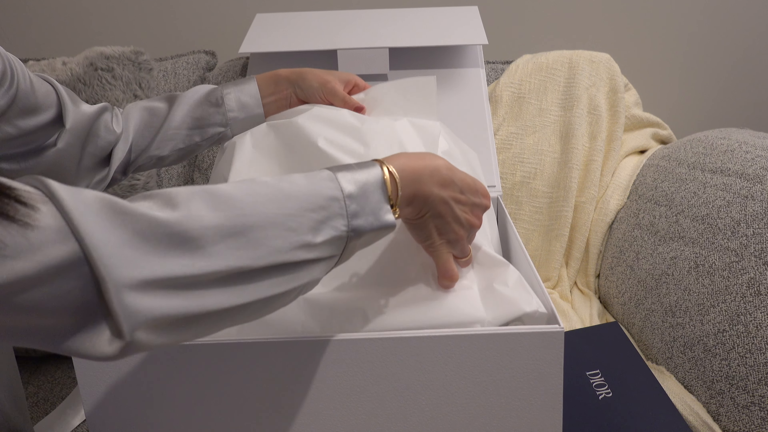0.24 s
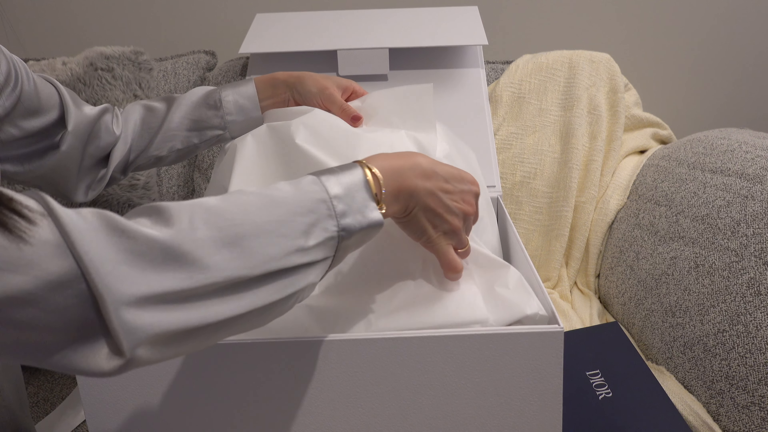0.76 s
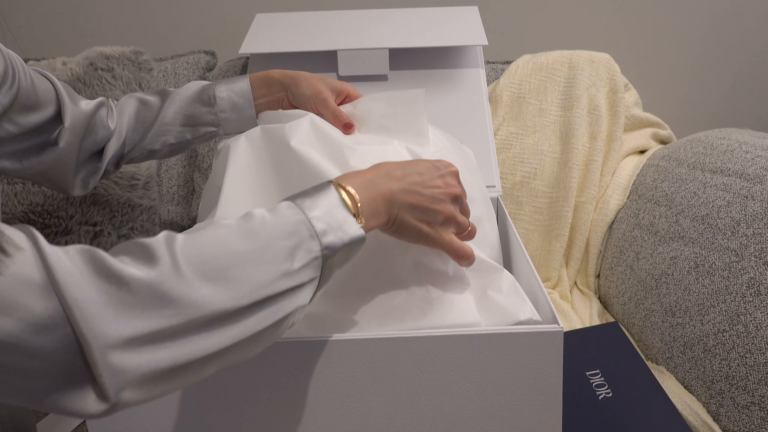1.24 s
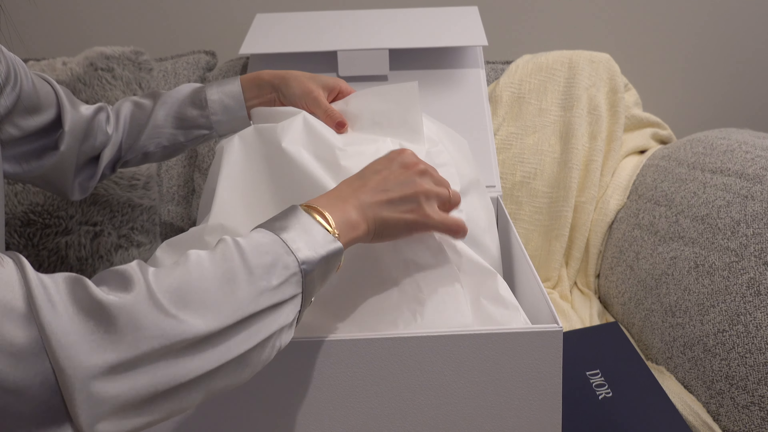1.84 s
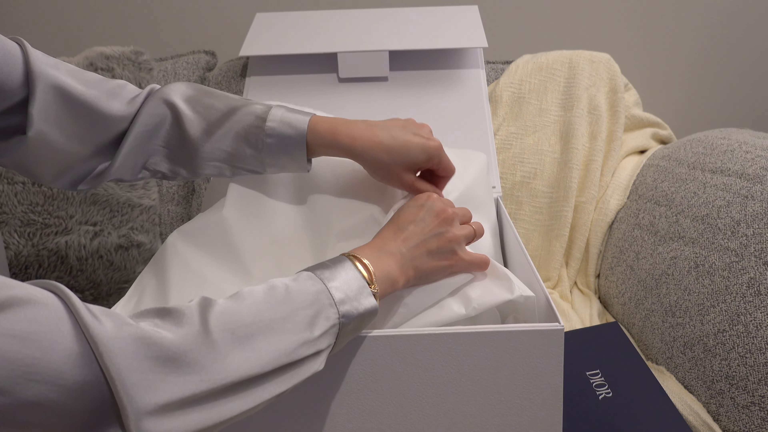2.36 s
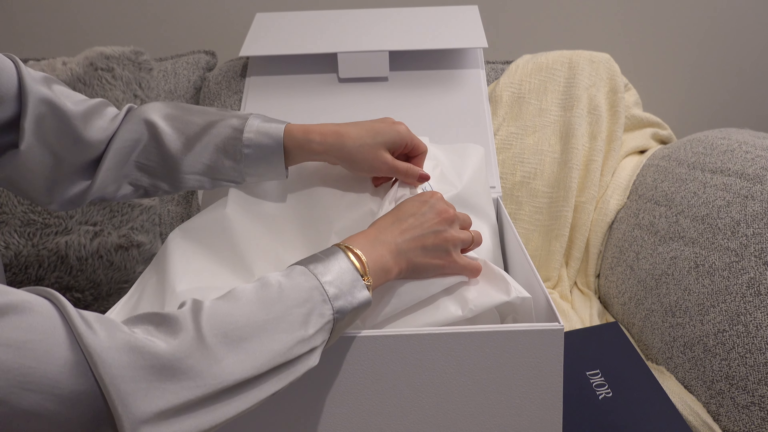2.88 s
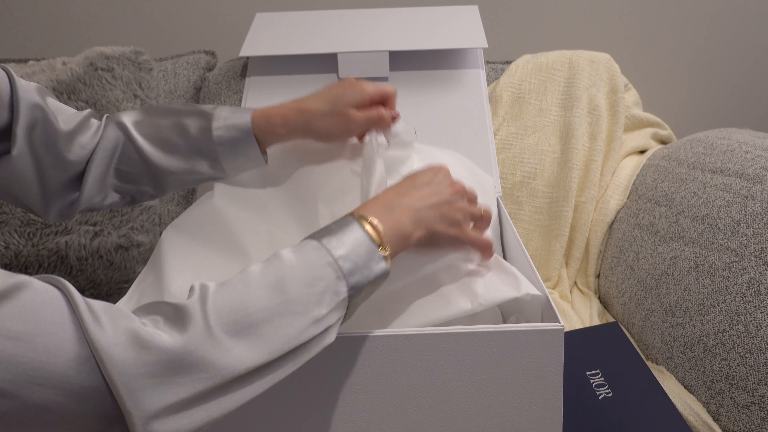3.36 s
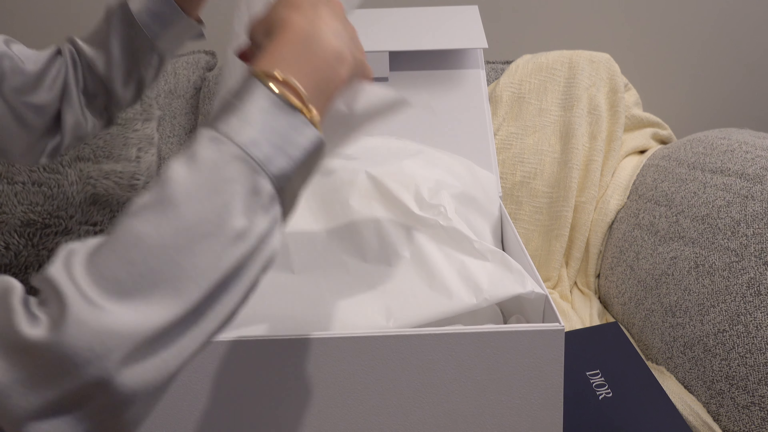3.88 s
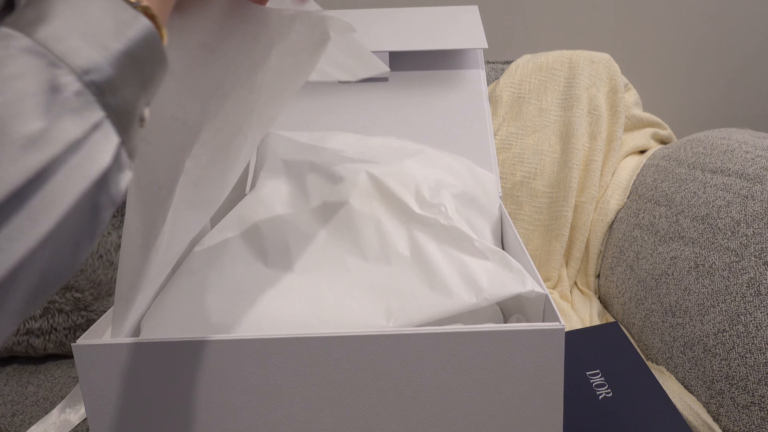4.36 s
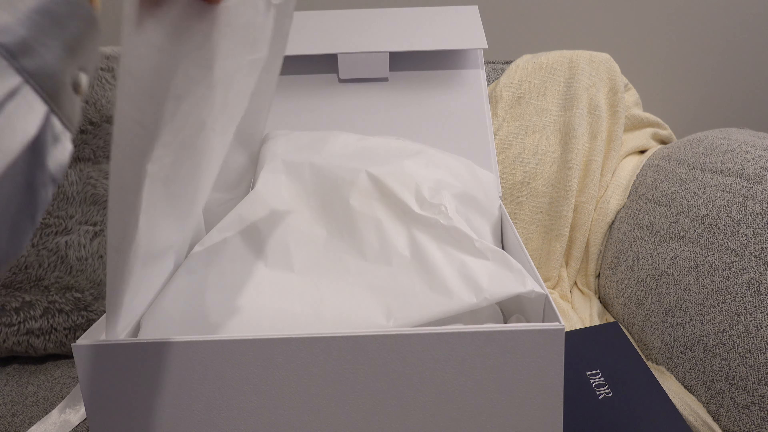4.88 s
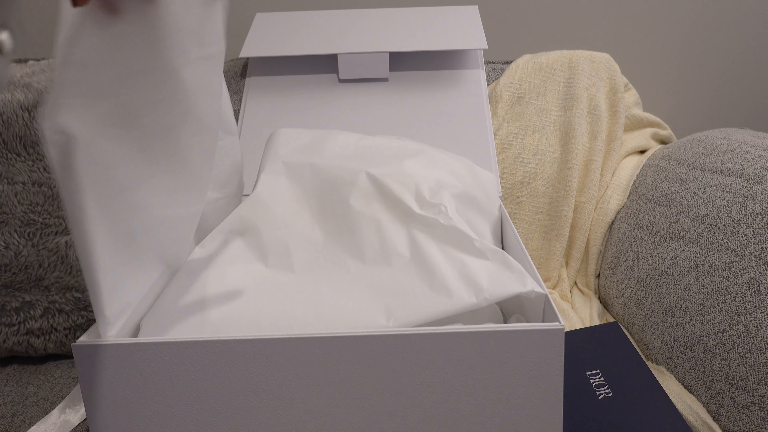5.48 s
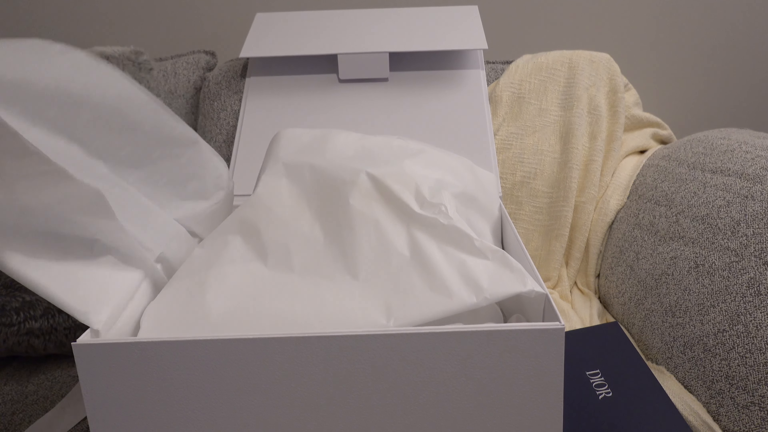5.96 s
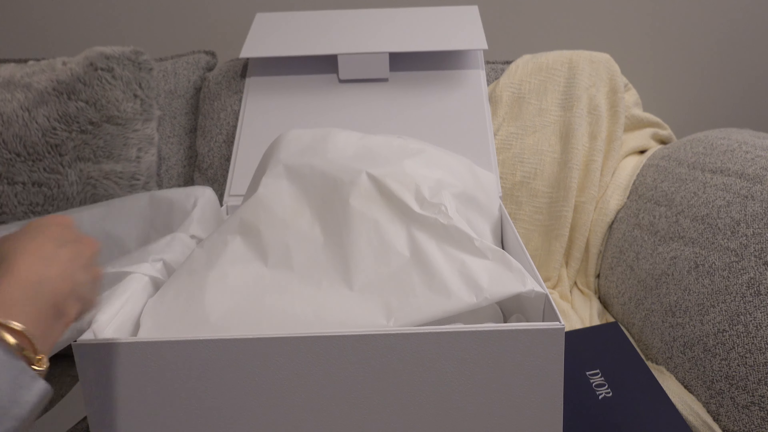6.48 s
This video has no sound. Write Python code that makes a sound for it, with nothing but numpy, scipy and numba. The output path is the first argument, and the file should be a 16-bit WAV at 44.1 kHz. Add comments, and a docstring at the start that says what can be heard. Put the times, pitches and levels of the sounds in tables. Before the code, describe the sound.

Thin tissue paper crinkles and rustles close up as hands pick it apart and fold it back inside a cardboard box.

```python
"""Tissue paper in a gift box.

Two hands pick apart and fold back the tissue lining a cardboard box on a sofa, close to the microphone.
Each buckling crease releases strain as a short papery ring and a bright crack; thousands make the rustle.
The sheets also slide over each other and displace air, and the box and a small, soft room reverberate."""
import sys
import numpy as np
from scipy import signal
from scipy.fft import rfft, irfft, next_fast_len
from scipy.io import wavfile
from scipy.ndimage import uniform_filter1d, map_coordinates
from numba import njit

SR = 44100
rng = np.random.default_rng(int(sys.argv[2]) if len(sys.argv) > 2 else 0)


def inscribe(sig):
    """Save sig as 16-bit PCM at rate SR to the path in sys.argv[1].

    A 1-D sig is mono; a 2-D sig holds one channel per row.
    Samples are clipped to [-1, 1] before scaling.
    """
    pcm = np.round(np.clip(np.atleast_2d(sig).T, -1, 1) * 32767)
    wavfile.write(sys.argv[1], SR, pcm.astype(np.int16))


N = 296352
T = np.arange(N) / SR
TOP_HZ = 15800

# Levels in the tables are relative.
# faint rustle of sheets that are just held (time [s], level [dB])
HELD_RUSTLE = [(0, -35.5), (0.9, -39), (1.0, -47.5), (1.4, -41.5), (3.6, -39.5), (4.4, -42), (5.15, -44),
               (6.4, -46), (6.72, -53)]
# pulls and lifts; crispness is crack over panel level (time [s], length [s], level [dB], crispness [dB])
HAND_STROKES = [(-0.061, 0.16, -36, -2.5), (0.155, 0.063, -30.5, -3), (0.253, 0.18, -30.5, 0.5),
                (0.467, 0.15, -30, 1), (0.684, 0.176, -30, -2.5), (1.008, 0.039, -39.5, 0),
                (1.066, 0.24, -33.5, -0.5), (1.326, 0.095, -39, 1), (1.45, 0.16, -36.5, 0.5),
                (1.632, 0.082, -30.5, -1.5), (1.743, 0.049, -37, 1.5), (1.904, 0.21, -32, -2.5),
                (2.151, 0.04, -38, -1.5), (2.285, 0.022, -32.5, -1.5), (2.342, 0.18, -35, 1.5),
                (2.56, 0.23, -33, 0), (2.767, 0.21, -31, 0), (3.011, 0.17, -32, 0.5),
                (3.254, 0.226, -35.5, 0.5), (3.576, 0.18, -35.5, 1.5), (3.812, 0.22, -22.5, 1.5),
                (4.052, 0.18, -33, -0.5), (4.232, 0.11, -37.5, 1), (4.424, 0.06, -37.5, 0.5),
                (4.53, 0.21, -30, 0), (4.778, 0.11, -33.5, 1), (4.867, 0.076, -39, -7),
                (5.236, 0.34, -27, -0.2), (5.554, 0.3, -33, -2), (5.886, 0.21, -33, -1.5),
                (6.052, 0.37, -32, -1.5), (6.485, 0.077, -42.5, -10)]
# sliding as opposed to buckling (time [s], power share [0-1])
SLIDING_SHARE = [(0, 0.54), (.6, 0.46), (1.05, 0.38), (2.4, 0.2), (3.1, 0.32), (3.6, 0.65), (3.95, 0.56),
                 (4.5, 0.2), (5.15, 0.37), (5.35, 0.79), (6.35, 0.62), (6.7, 0.4)]
# spectral shaping of the paper panels (frequency [Hz], gain [dB])
PANEL_SPECTRUM = [(30, -49), (120, -39.5), (350, -10.5), (700, -6.5), (1300, -1.5), (2400, 1.5),
                  (3400, 2.5), (4200, 0.5), (5200, -2.5), (8000, -3.5), (16000, -36.5)]
# spectral shaping of the cracking ridges (frequency [Hz], gain [dB])
CRACK_SPECTRUM = [(30, -43), (500, -6), (3000, -24), (5200, -3.5), (7000, 1), (8500, 1.5), (10300, 3.5),
                  (12500, 0.5), (14500, -0.5), (16000, 2)]
# air moved by sheets and sleeves (time [s], level [dB])
AIR_LEVEL = [(0, -45.5), (0.8, -46), (1.2, -48.5), (3.1, -48.5), (3.95, -49), (4.6, -54), (5.4, -51),
             (6.35, -48), (6.72, -46)]
# spectrum of that air (frequency [Hz], gain [dB])
AIR_SPECTRUM = [(25, -23), (60, -23), (90, -7), (140, -3.5), (220, -5.5), (280, 4.5), (480, -2), (700, 3),
                (1200, -1.5), (3000, -49)]
# air resonances of the open box and the room (frequency [Hz], decay time [s], level [dB])
AIR_MODES = [(178.7, 0.016, -20), (215.2, 0.034, -11), (230.6, 0.032, -14.5), (294, 0.014, -23),
             (378, 0.017, -14.5)]
# background noise of the room (frequency [Hz], gain [dB])
ROOM_TONE_SPECTRUM = [(25, -16), (60, -7), (90, 0.5), (140, -5), (190, 9), (212, 0), (240, 0.5), (400, 3),
                      (900, -4), (2500, -3), (8000, -29), (16000, -31)]
# fingers crush a bunch of creases (time [s], length [s], level [dB], crispness [dB])
FINGER_CRUSHES = [(0.032, 0.035, -28.5, -2), (0.553, 0.012, -28, 4), (0.583, 0.026, -22.5, -12),
                  (0.808, 0.014, -25.5, 0), (1.667, 0.014, -25.5, 0), (2.198, 0.037, -23.5, -6),
                  (2.404, 0.026, -25.5, -4), (3.132, 0.026, -23.5, -1.5), (3.635, 0.0254, -26.5, -1),
                  (3.669, 0.012, -24.5, -4), (3.971, 0.045, -21.5, -2.5), (4.843, 0.018, -26, -3)]
# big single creases flip over (time [s], panel frequency [Hz], panel level [dB], crack level [dB])
CREASE_SNAPS = [(0.0478, 2220, -27.5, -29), (0.1426, 2300, -32, -27), (0.1973, 2430, -26, -27),
                (0.2565, 2200, -28, -28), (0.3162, 2340, -24, -35), (0.4797, 3000, -32, -22.5),
                (0.5408, 2700, -36, -19), (0.857, 2400, -32, -24.5), (0.9859, 4300, -39, -33.5),
                (1.1191, 2640, -33, -31), (1.3395, 3040, -28.5, -26), (1.484, 2540, -28, -30),
                (1.509, 2250, -23.5, -33), (1.546, 2700, -23, -36), (1.5572, 2070, -24.5, -31),
                (1.6644, 3070, -26, -24.5), (1.9285, 2500, -31, -34), (1.961, 2800, -38, -28.5),
                (2.285, 3040, -35, -27), (2.3112, 3220, -32, -27.5), (2.6805, 3200, -27, -25.5),
                (2.742, 2800, -32, -20), (2.957, 2700, -27, -24.5), (3.131, 2170, -21.5, -20.5),
                (3.4461, 3260, -30, -33), (3.5387, 3100, -43, -26), (3.727, 2900, -28.5, -25),
                (4.439, 3460, -29, -23.5), (4.538, 2600, -37, -28), (4.577, 3540, -29, -25),
                (4.6203, 3030, -24.5, -22.5), (5.0935, 2600, -47, -35), (5.133, 1990, -36, -48),
                (5.191, 2800, -40, -34), (5.2394, 2900, -45, -34), (5.6533, 2800, -43, -23.5),
                (5.9166, 2820, -25.5, -31), (6.5346, 2800, -37, -34.5), (6.5973, 2340, -36, -33)]
# hands bump the box (time [s], frequency [Hz], decay time [s], level [dB])
BOX_NUDGES = [(2.225, 48, .014, -49), (3.68, 180, 0.021, -37), (3.77, 42, .02, -54),
              (4.017, 85, 0.011, -43)]
# reflections common to both sides; the sofa absorbs the lows (frequency [Hz], gain [dB])
MID_ECHO_SPECTRUM = [(300, -13), (1200, -5), (3000, -2), (16000, -19)]
# reflections that differ between the sides (frequency [Hz], gain [dB])
SIDE_ECHO_SPECTRUM = [(60, -20), (130, -19), (300, -21), (600, -12.5), (1400, -14), (2200, -25),
                      (3400, -2.5), (4700, 6), (6500, 0), (12000, -0.5), (15000, 2)]
# the top sheet travels left and out of the box (time [s], left lead [ms], diffuseness [dB])
SHEET_PATH = [(0, 0.0069, -1), (3.3, 0, 0), (3.65, 0, -1.5), (4.1, 0.013, 1.5), (4.65, 0, -0.5),
              (5, 0.024, 3.5), (5.7, 0.022, 1.5), (6.7, 0.032, 3.5)]


def undb(db):
    """Amplitude ratio of a level in decibels."""
    return 10 ** (np.asarray(db) / 20)


def curves(table):
    """Linear interpolation of a timed table: each column at every sample."""
    times, *columns = np.transpose(table)
    return [np.interp(T, times, column) for column in columns]


def unit(x):
    """Normalisation to rms 1."""
    return x / np.sqrt(np.mean(x ** 2))


def walk(rate):
    """Linear interpolation of random values, rate per second; spread near 1."""
    hold = int(SR / rate)
    steps = np.repeat(rng.standard_normal(N // hold + 1), hold)
    return 1.2 * uniform_filter1d(steps, hold)[:N]


def colour(x, spectrum):
    """Minimum-phase filtering: a folded cepstrum gives a causal filter with the given gains."""
    size = next_fast_len(len(x) + 4096)
    hz, db = np.transpose(spectrum)
    bin_hz = np.maximum(np.fft.rfftfreq(2 * size, 1 / SR), 1)
    gain = undb(np.interp(np.log(bin_hz), np.log(hz), db))
    cepstrum = irfft(np.log(gain))
    cepstrum[1:size] *= 2
    cepstrum[size + 1:] = 0
    return irfft(rfft(x, 2 * size) * np.exp(rfft(cepstrum)))[:len(x)]


@njit
def rings(start, hz, decay, size):
    """Superposition of damped sines, each with energy near size squared."""
    out = np.zeros(N)
    for k in range(len(start)):
        first = int(start[k] * SR) + 1
        exponent = (2j * np.pi * hz[k] - 1 / decay[k]) / SR
        amplitude = 2 * size[k] / np.sqrt(decay[k] * SR)
        phasor = amplitude * np.exp(exponent * (first - start[k] * SR))  # onset between samples
        pole = np.exp(exponent)
        for i in range(max(first, 0), min(N, first + int(6 * decay[k] * SR))):
            out[i] += phasor.imag
            phasor *= pole
    return out


def creases(rate, scatter_db, panel_hz=2400, panel_spread=0.25, panel_cycles=0.83,
            crack_hz=9600, crack_spread=0.44, crack_cycles=0.67, drift=0.062):
    """Buckling at random times with power-law sizes: each crease rings a panel and cracks its ridge."""
    count = int(rate * N / SR)
    when, rank = rng.spawn(1)[0].random((count, 2)).T
    panel_detune, crack_detune, balance = rng.spawn(1)[0].standard_normal((count, 3)).T
    start = when * N / SR
    size = undb(-scatter_db * np.log(rank + .012))  # a crease can only store so much strain
    # neighbouring creases share a slowly wandering pitch, so their pitch drifts together
    low = panel_hz * np.exp(panel_spread * panel_detune + drift * np.interp(start, T, walk(50)))
    high = crack_hz * np.exp(crack_spread * crack_detune + drift * np.interp(start, T, walk(50)))
    high = np.minimum(high, TOP_HZ)
    panel = rings(start, low, panel_cycles / low, size * undb(-1.5 * balance))
    crack = rings(start, high, crack_cycles / high, size * undb(3.6 * balance))
    return np.array([unit(panel), unit(crack)])


def flurries(rate=70, fade_s=0.0063, steady_share=0.55):
    """Avalanche envelope, rms 1: a yielding crease sets off its neighbours in a fading burst."""
    chance, strength = rng.random((N, 2)).T
    kicks = (chance < rate / SR) * strength ** 2
    bursts = signal.lfilter([1], [1, -np.exp(-1 / (fade_s * SR))], kicks)
    return np.sqrt(steady_share + (1 - steady_share) * bursts / bursts.mean())


def handling(rise_share=0.58, sag_db_per_s=9.5, settle_s=0.055, held_crisp_db=-1.5):
    """Incoherent addition: held sheets and strokes sum in power, giving level and crispness in dB."""
    panel = undb(curves(HELD_RUSTLE)[0]) ** 2
    crack = panel * undb(held_crisp_db) ** 2
    for start, length, db, crisp_db in HAND_STROKES:
        age, rise = T - start, rise_share * length
        swell = np.clip(age / rise, 0, 1) ** 0.53
        sag_db = sag_db_per_s * np.maximum(age - rise, 0)  # the fold gives way
        settle = np.exp(-np.maximum(age - length, 0) / settle_s)
        power = (swell * settle * undb(db - sag_db)) ** 2
        panel = panel + power
        crack = crack + power * undb(crisp_db) ** 2
    return 10 * np.log10(panel), 10 * np.log10(crack / panel)


def rustle(level_db, crisp_db, taut_db=-25.5, sparkle_db=2.9):
    """Fitful buckling over stick-slip friction, the dense tiny catches of sheet sliding on sheet."""
    buckling = creases(rate=2600, scatter_db=3.2, panel_hz=2500, panel_spread=.26,
                       crack_spread=.21, drift=.12) * flurries()
    buckling[1] *= unit(undb(sparkle_db * walk(45)))  # cracks beam as folds face the microphone
    sliding = creases(rate=14000, scatter_db=2.5, panel_hz=2650)
    slide = curves(SLIDING_SHARE)[0]
    slack = np.sqrt(1 - slide) * buckling + np.sqrt(slide) * sliding
    # pulled hard, the sheet goes taut and its panels ring higher
    taut = creases(rate=6300, scatter_db=3.0, panel_hz=3300, panel_spread=.24, panel_cycles=0.9,
                   crack_hz=10700, crack_spread=0.067)
    tension = .7 * np.clip(undb(level_db - taut_db), 0, 1) ** 2
    panel, crack = np.sqrt(1 - tension) * slack + np.sqrt(tension) * taut
    return np.array([panel * undb(level_db), crack * undb(level_db + crisp_db)])


def swish(rustle_db, reference_db=-34):
    """Cavity resonance: air displaced by sheets and sleeves hums faintly in the open box."""
    air = unit(colour(rng.standard_normal(N), AIR_SPECTRUM))
    hum = 0
    for hz, decay, db in AIR_MODES:
        pole = np.exp((2j * np.pi * hz - 1 / decay) / SR)
        hum = hum + undb(db) * unit(signal.lfilter([1], [1, -pole], air).real)
    brisk_db = 0.57 * (rustle_db - reference_db)  # brisker strokes move more air
    return unit(air + hum) * undb(curves(AIR_LEVEL)[0] + brisk_db + 3.5)


def room_tone():
    """Stationary noise: the faint, low background of the room."""
    return undb(-50) * unit(colour(rng.standard_normal(N), ROOM_TONE_SPECTRUM))


def crushes(edge_s=0.0011):
    """Collective buckling: a short avalanche of creases as the fingers close."""
    crumple = creases(rate=3500, scatter_db=3.5)
    out = 0
    for start, length, db, crisp_db in FINGER_CRUSHES:
        grip = np.clip(np.minimum(T - start, start + length - T) / edge_s, 0, 1)
        out = out + crumple * grip * undb([[db - 5.5], [db + crisp_db]])  # panel, crack
    return out


def snaps(crack_hz=8600, panel_cycles=1.4, crack_cycles=2.5):
    """Snap-through: a big crease flips, three neighbours follow at once and four small ones later."""
    onset, low, panel_db, crack_db = np.transpose(CREASE_SNAPS)
    high = crack_hz * np.exp(0.12 * rng.standard_normal(len(onset)))
    panel = crack = 0
    for wait_s, db in [(0, -1)] + [(.0012, -9)] * 3 + [(.007, -15)] * 4:
        start = onset + wait_s * rng.uniform(.5, 2, len(onset))
        detune = np.exp(.22 * rng.standard_normal(len(onset)) * (wait_s > 0))
        ridge_hz = np.minimum(high * detune, TOP_HZ)
        size = np.sqrt(.002 * SR) * undb(db)
        panel = panel + rings(start, low * detune, panel_cycles / low, size * undb(panel_db))
        crack = crack + rings(start, ridge_hz, crack_cycles / high, size * undb(crack_db))
    return np.array([panel, crack])


def nudges():
    """Heavily damped vibration: dull bumps of the box on the cushion."""
    start, hz, decay, db = np.transpose(BOX_NUDGES)
    return rings(start, hz, decay, undb(db) * np.sqrt(decay * SR) / 2)


def room(x, diffuse_db, box_decay_s=0.0069, room_t60_s=0.55):
    """Reverberation by convolution: direct sound, quick box echoes and a soft tail; left and right."""
    t = T[:SR // 3]
    box_gain, tail_gain = undb(-6.5), undb(-7.5)

    def reflections(spectrum):
        """Diffuse impulse response: exponentially decaying noise."""
        box = rng.standard_normal(len(t)) * (t > .0007) * np.exp(-t / box_decay_s)
        build_up = np.clip(t / 0.0049 - .3, 0, 1)
        tail = rng.standard_normal(len(t)) * build_up * undb(-60 * t / room_t60_s)
        return colour((box_gain * unit(box) + tail_gain * unit(tail)) / np.sqrt(len(t)), spectrum)

    # the crinkling jumps about on the sheet, and every spot has its own echo pattern
    spots = np.array([walk(110) for _ in range(6)])
    mid, side = x, 0
    for share in spots / np.linalg.norm(spots, axis=0):
        mid = mid + signal.oaconvolve(x * share, reflections(MID_ECHO_SPECTRUM))[:N]
        side = side + signal.oaconvolve(x * share, reflections(SIDE_ECHO_SPECTRUM))[:N]
    side = side * undb(diffuse_db)
    power = 1 + (box_gain ** 2 + tail_gain ** 2) / 2
    return np.array([mid + side, mid - side]) / np.sqrt(power)


def scene():
    """Superposition of paper, air and box at two close microphones; arrival time gives direction."""
    level_db, crisp_db = handling()
    panel, crack = rustle(level_db, crisp_db) + crushes() + snaps()
    paper = colour(panel, PANEL_SPECTRUM) * undb(1.6) + colour(crack, CRACK_SPECTRUM) * undb(1.56)
    lead_ms, diffuse_db = curves(SHEET_PATH)
    left, right = room(paper + room_tone() + swish(level_db) + nudges(), diffuse_db)
    lag = (lead_ms + .003 * walk(60)) * SR / 1000  # creases lie a little left and right of each other
    right = map_coordinates(right, [np.arange(N) - lag], order=5)
    return np.array([left * undb(-0.87), right * undb(-1.11)])


def record(dry):
    """Band limiting: a steep elliptic low-pass cuts the highest treble."""
    return signal.sosfilt(signal.ellip(10, .2, 70, TOP_HZ, fs=SR, output="sos"), dry)


dry = scene()
out = record(dry)
inscribe(out)
```